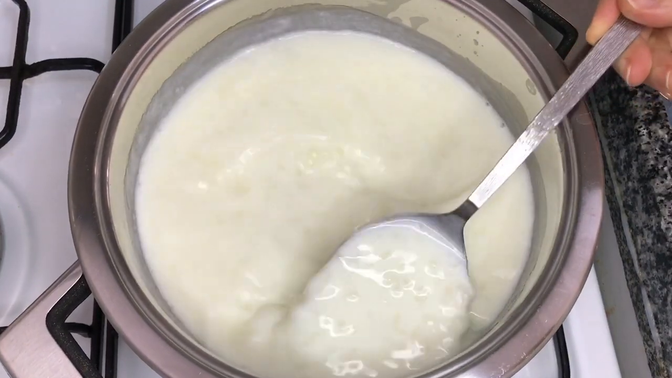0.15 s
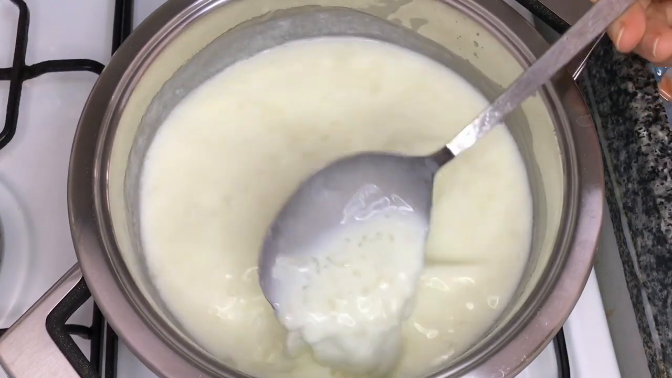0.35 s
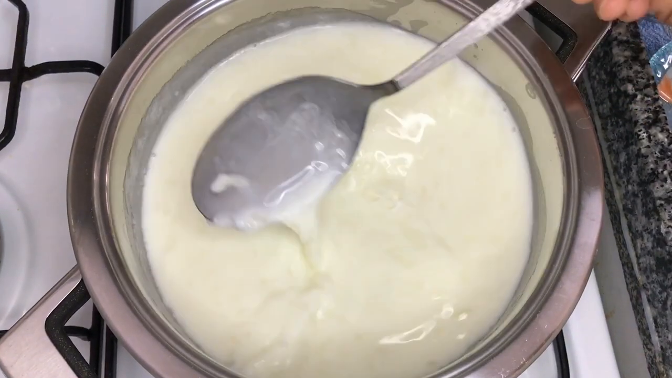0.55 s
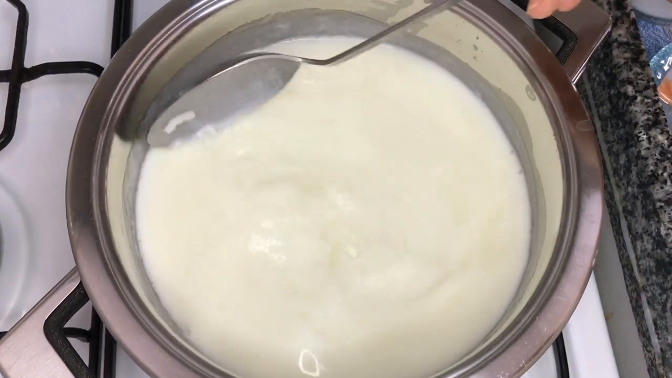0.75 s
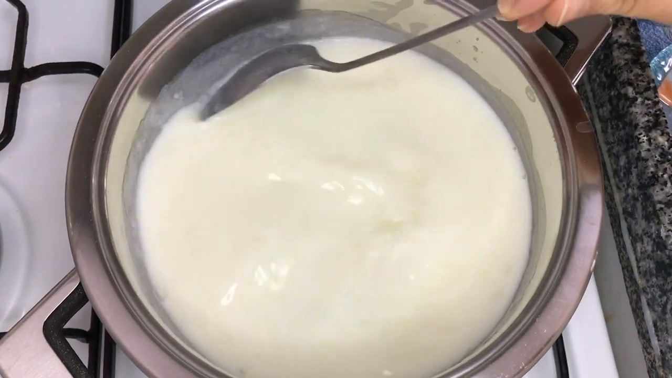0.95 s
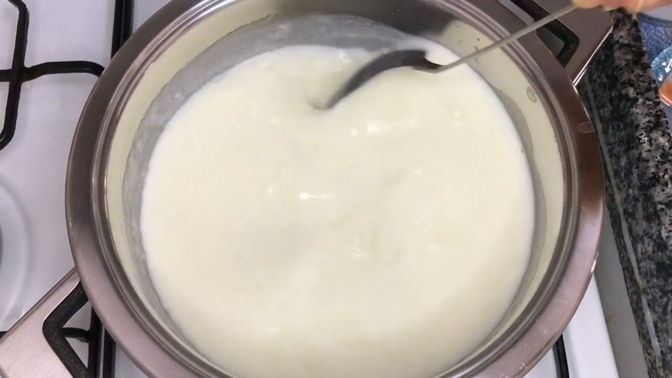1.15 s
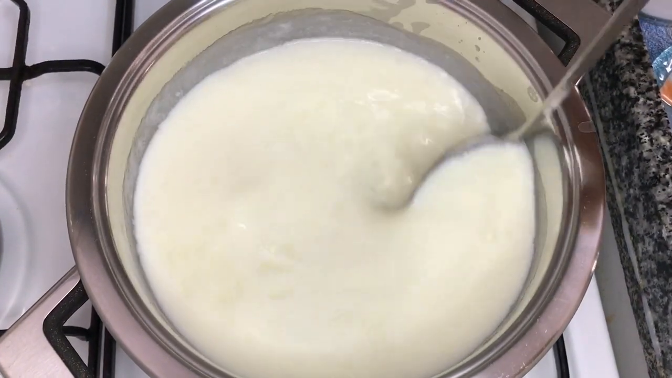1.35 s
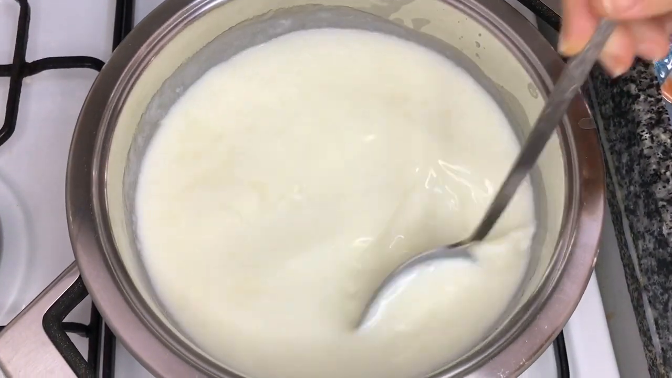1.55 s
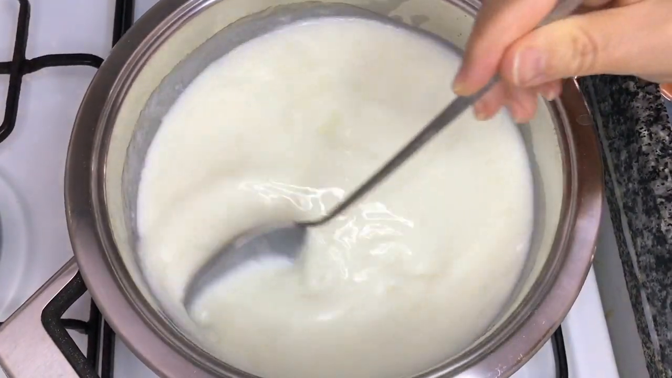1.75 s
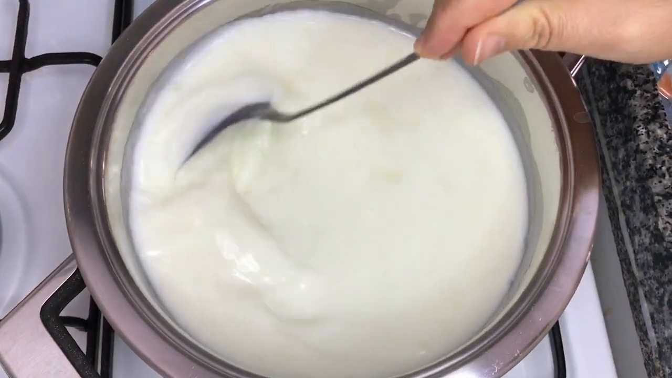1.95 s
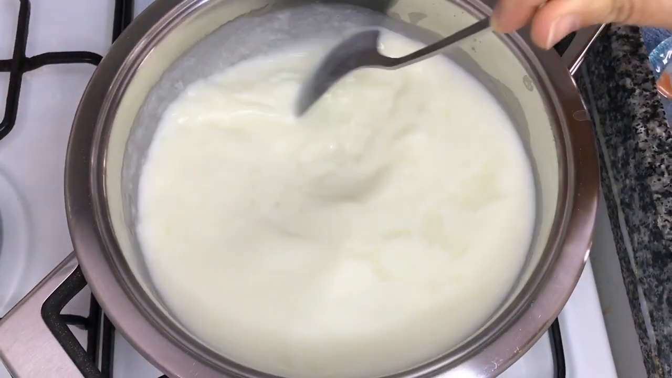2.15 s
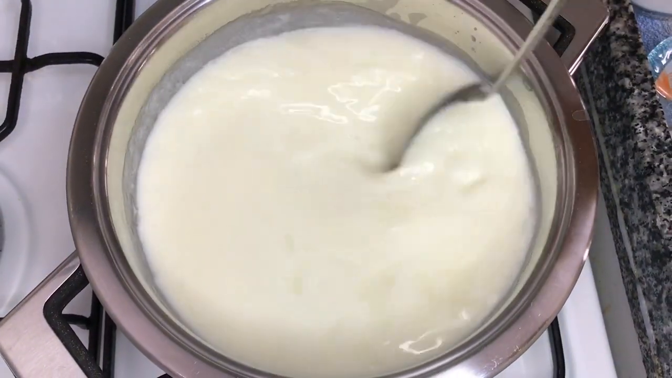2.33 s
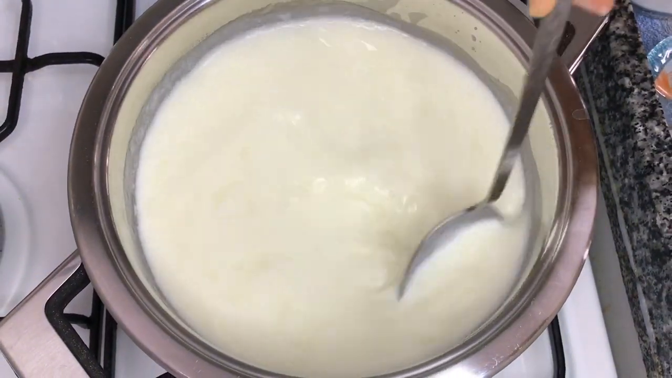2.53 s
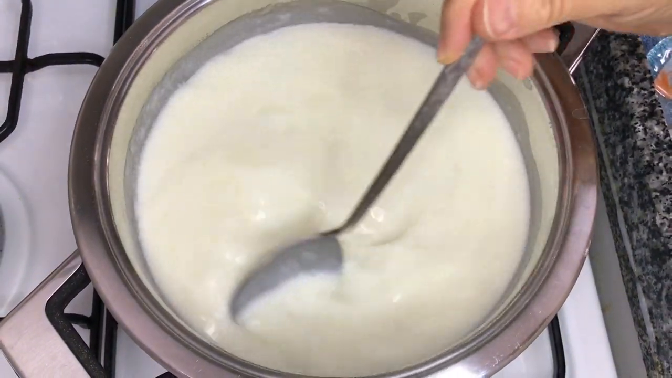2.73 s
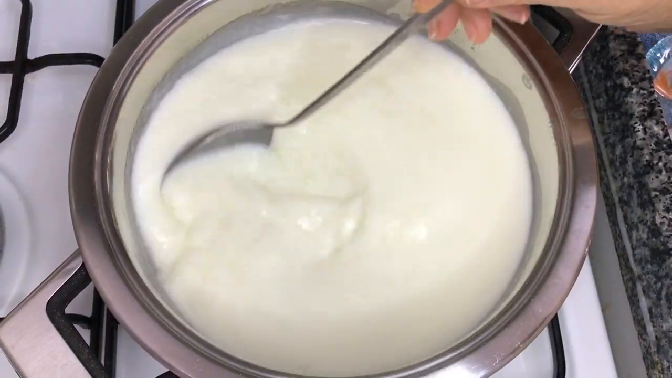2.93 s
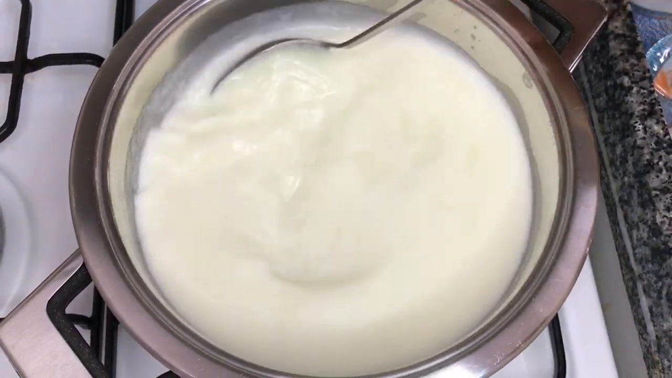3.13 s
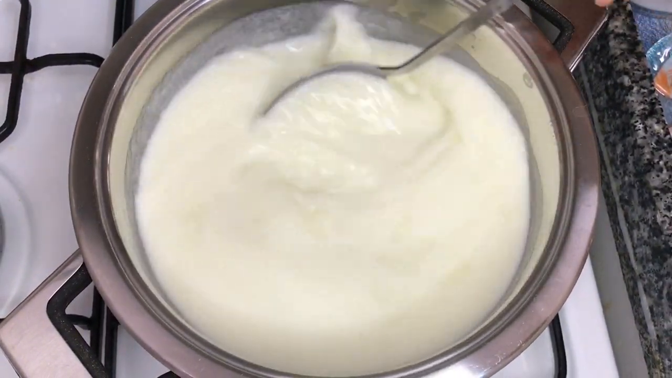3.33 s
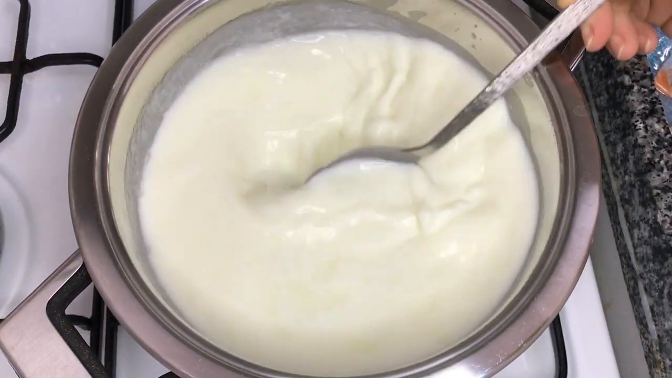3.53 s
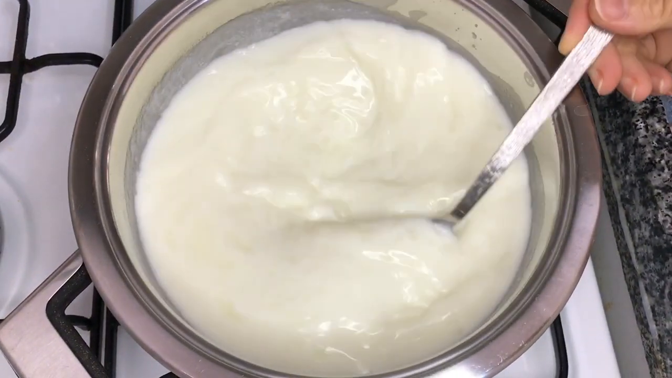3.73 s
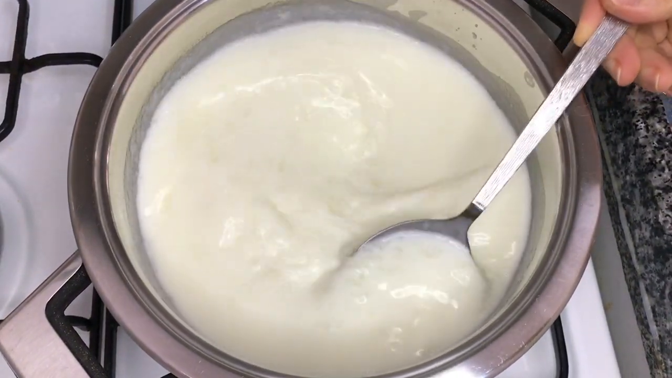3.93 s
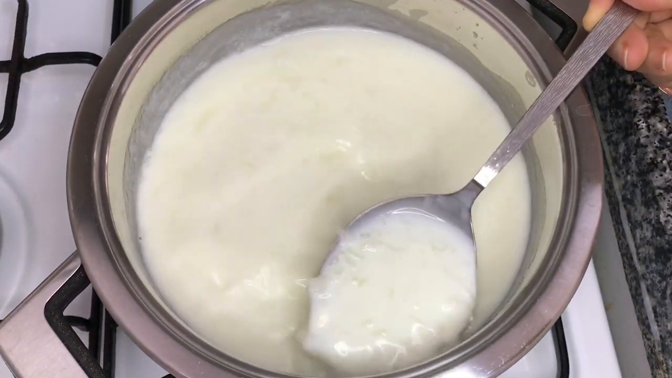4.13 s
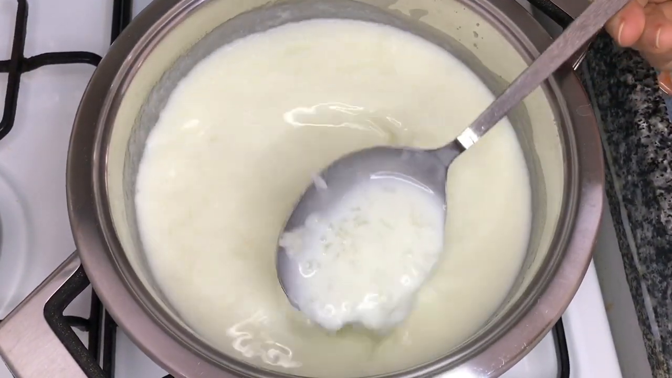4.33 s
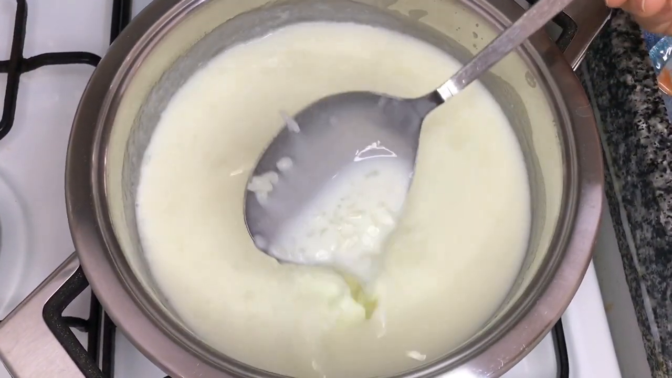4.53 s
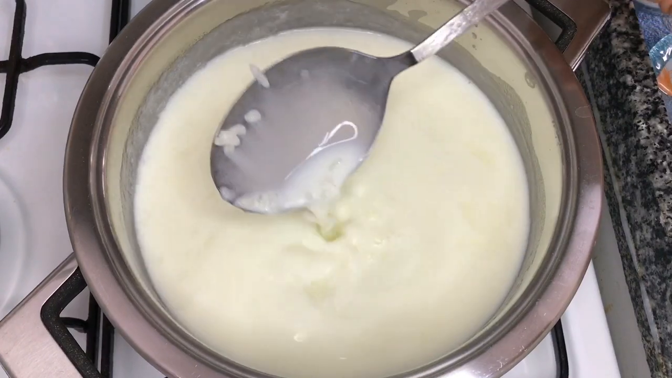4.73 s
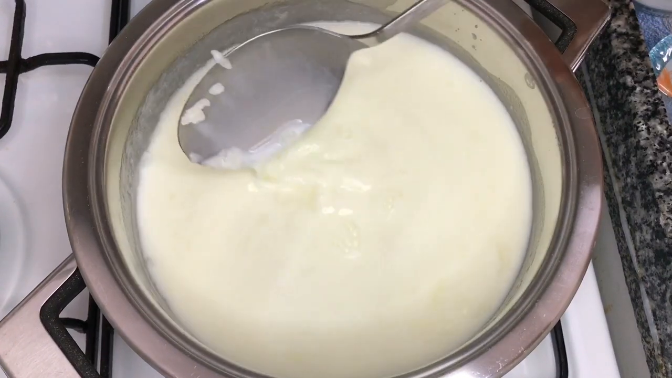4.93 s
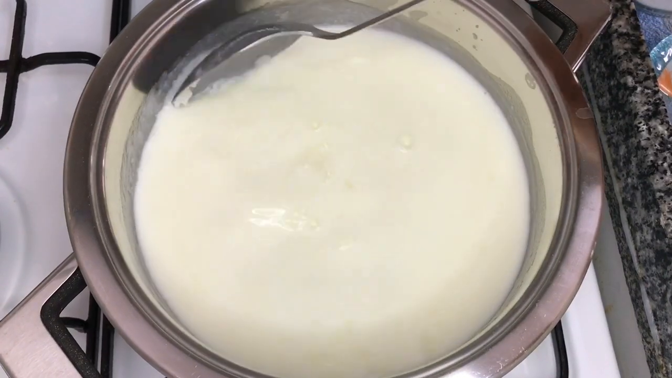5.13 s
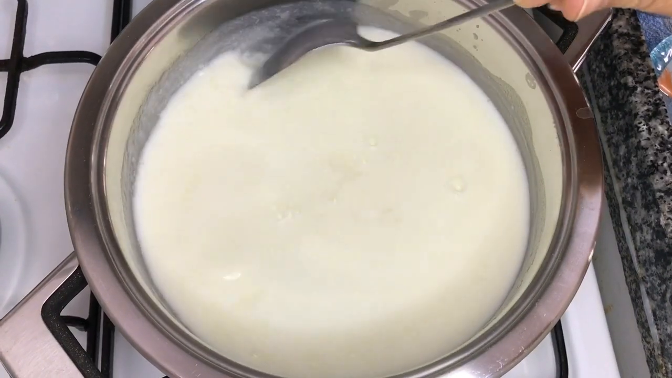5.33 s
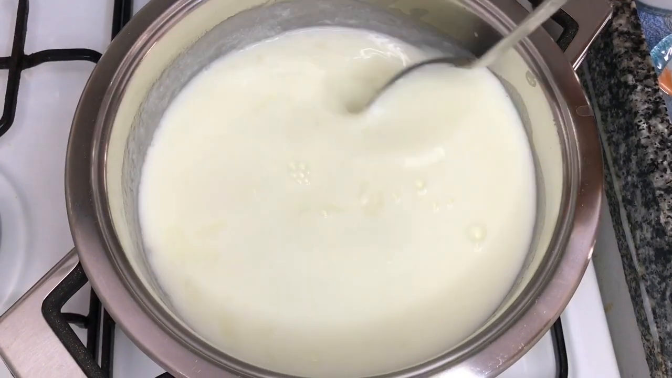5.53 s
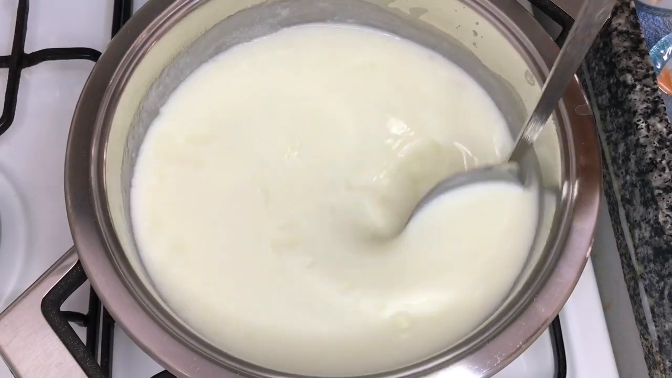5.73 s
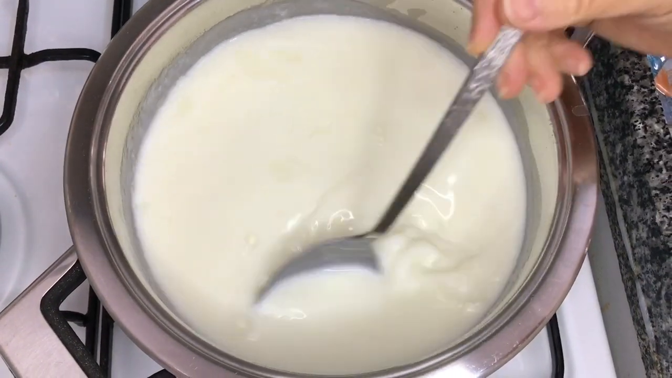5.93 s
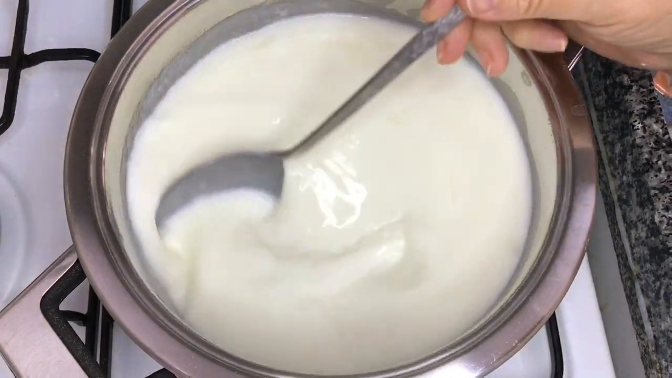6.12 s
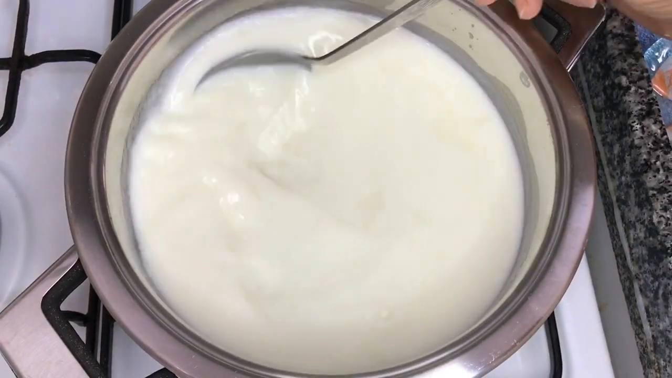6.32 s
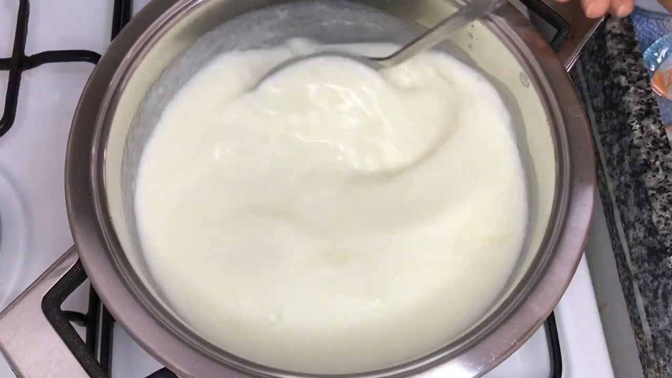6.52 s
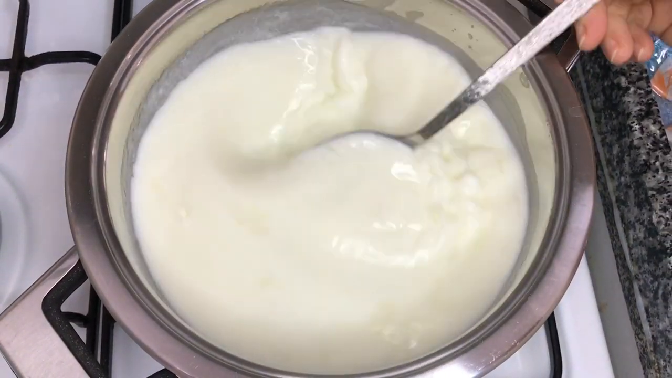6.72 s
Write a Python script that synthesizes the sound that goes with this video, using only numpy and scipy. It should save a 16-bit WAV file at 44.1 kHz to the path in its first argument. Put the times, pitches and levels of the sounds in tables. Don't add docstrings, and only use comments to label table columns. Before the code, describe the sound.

Close, dry-sounding stirring in a small kitchen over quiet burner hiss, low motor rumble, hum and faint passing cars. A brief faint drag opens; from 0.15 to 0.65 s milk falls from the lifted spoon as tiny high ringing plinks. At 1.1 s a sharp clink on the pot wall, then gritty scraping with wavering metallic singing from 1.2 s. Duller knock at 1.7, a strong clink near 2.13, swishing strokes peaking around 2.2, smaller taps at 2.4, 2.7 and 2.9. Scrapes continue at 3.0 and 3.3, with a rising wet gulp at 3.55 and thinner scraping to 4.0. From 4.45 to 4.85 a denser cluster of bubbly drips, then almost only background. At 5.48 the hardest, brightest clink, scraping again at 5.6, a knock at 6.03, softer brushing strokes at 6.15 to 6.65, and two quick low gulps at 6.7.

```python
import sys
import numpy as np
from scipy import signal
from scipy.fft import rfft, irfft
from scipy.io import wavfile
from scipy.ndimage import uniform_filter1d, map_coordinates

SR = 44100
rng = np.random.default_rng(int(sys.argv[2]) if len(sys.argv) > 2 else 0)


def master_out(mix):
    frames = np.transpose(np.atleast_2d(mix))
    ceiling = np.clip(frames, -1, 1)
    pcm = np.round(ceiling * 32767).astype(np.int16)
    wavfile.write(sys.argv[1], SR, pcm)


def makeup_ratio(level_db):
    decades = np.asarray(level_db, float) / 20
    return 10 ** decades


N = 298557

# peak_s, rise_s, fall_s, drag_db, edge_bite_db
STROKES = [(0.0, .05, 0.075, -51.5, -5), (1.098, 0.041, 0.0024, -46.5, 7), (1.3, 0.12, 0.15, -36.5, -2),
           (1.72, 0.049, 0.32, -38, -4), (1.95, 0.058, 0.038, -41.5, -15), (2.1, 0.087, 0.024, -52.5, -12),
           (2.18, 0.038, 0.18, -34.5, -3.5), (2.43, 0.085, 0.14, -40.5, -1.5), (2.74, 0.08, 0.1, -41, -1.5),
           (2.87, 0.086, 0.18, -41.5, 5), (3.02, 0.08, 0.068, -39, -6), (3.3, 0.069, 0.22, -35.5, -1),
           (3.54, 0.05, 0.05, -44, 8), (3.72, 0.04, 0.11, -39, 10), (3.96, 0.069, 0.059, -42.5, 0.5),
           (5.39, .025, .03, -46, 12), (5.46, 0.05, 0.0095, -41, 6), (5.58, 0.077, 0.16, -35.5, 2),
           (5.82, 0.086, 0.087, -41, 0), (6.15, 0.13, 0.2, -38, 2), (6.48, 0.035, 0.074, -37, -1),
           (6.649, 0.086, 0.088, -38, 2)]
# freq_hz, level_db_per_hz
DRAG_SPECTRUM = [(260, -60), (450, -17.5), (725, -10), (1040, -7.5), (1600, -4.5), (2950, -2), (3300, -7),
                 (4520, -0.5), (9000, -25.5), (11700, -60), (19800, -120)]
# freq_hz, level_db_per_hz
GRIT_SPECTRUM = [(4500, -30), (6500, -3), (8500, 0), (11000, -5), (14000, -10), (16500, -16)]
# pitch_hz, width_hz, level_db
DRAG_TONES = [(985, 30, -9), (1264.5, 20, 3), (1570, 23, 4.5), (1734, 10, -1), (2040, 20, -9),
              (2369, 44, 3), (2752, 38, 2), (3043, 32, -2.5), (3570, 65, 0), (3834, 37, 0), (4150, 50, -6),
              (4490, 90, 0), (5450, 52, -7.5), (5920, 270, -8)]
# freq_hz, gain_db
MILK_DAMPING = [(350, 3.5), (650, -5.5), (5500, 4.5), (8000, 1), (16000, -30)]
# peak_s, half_length_s, level_db
GRAIN_CRUSHES = [(1.8, 0.074, -52.5), (2.3, 0.052, -52.5), (3.41, 0.056, -50.5), (5.64, 0.12, -66),
                 (6.18, .08, -58), (6.65, 0.063, -53)]
# peak_s, half_length_s, level_db, pitch_hz
BOWL = [(1.21, 0.025, -40.5, 1570), (1.288, 0.055, -37.5, 1322), (1.438, 0.065, -40.5, 1570),
        (1.77, .05, -44, 1320), (1.893, 0.022, -45.5, 1250), (1.963, .03, -39.5, 1924),
        (2.061, 0.062, -39, 1408), (2.18, 0.03, -43, 1260), (2.35, 0.048, -34, 1432),
        (2.447, 0.084, -41.5, 1640), (3.01, 0.07, -40, 1210), (3.27, 0.045, -42, 1225),
        (3.36, .04, -44, 1600), (3.446, 0.049, -41.5, 1250), (5.592, 0.036, -41, 1330),
        (6.06, .03, -52, 1340), (6.23, .08, -77, 1610), (6.617, 0.03, -53, 1250)]
# peak_s, half_length_s, level_db, pitch_hz
RIM = [(1.193, .05, -44, 2035), (1.32, .04, -42, 2880), (1.49, 0.053, -49, 2940), (1.774, .035, -42, 2740),
       (1.84, .035, -41, 2800), (1.95, .03, -44, 2240), (2.167, 0.027, -38, 2800),
       (2.212, 0.039, -38, 2490), (2.3, .05, -42.5, 2850), (2.38, 0.036, -44, 2940),
       (2.763, 0.072, -46.5, 2744), (2.947, 0.054, -46, 2800), (3.285, .035, -41.5, 2460),
       (3.345, .025, -40, 2340), (3.4, .025, -42, 2500), (3.73, 0.064, -47, 2325),
       (4.02, 0.056, -52.5, 2050), (5.52, .03, -38, 2280), (5.599, 0.048, -41, 2950),
       (5.78, .03, -49, 2280), (6.09, .02, -45, 2850), (6.5, .04, -47, 2800), (6.59, 0.034, -46, 2370)]
# peak_s, half_length_s, level_db, pitch_hz
NECK = [(1.3, 0.067, -49, 4500), (1.453, 0.065, -44.5, 4570), (1.635, .02, -48, 4210),
        (1.882, .025, -42, 3780), (1.95, .03, -40, 3550), (2.19, .05, -42, 4480), (2.278, .05, -42.5, 3620),
        (2.504, .05, -47, 4350), (2.93, 0.052, -43.5, 4490), (3.0, .035, -45, 3800),
        (3.278, 0.041, -43, 3770), (3.37, 0.041, -43.5, 4490), (3.44, .05, -44, 3850),
        (3.6, .03, -49, 3780), (3.7, .025, -43, 3900), (3.76, .035, -46, 3570), (3.82, 0.018, -46, 3960),
        (3.941, 0.039, -46.5, 4500), (3.988, .03, -48, 3460), (5.56, 0.043, -44, 4500),
        (5.702, 0.046, -44, 4530), (5.8, 0.055, -47, 4490), (5.925, .025, -44, 4260),
        (6.14, .05, -45, 4380), (6.49, 0.036, -43, 3750), (6.61, .03, -43, 4500), (6.7, 0.032, -48, 5600)]
# peak_s, fall_s, level_db
SWIRLS = [(0.0, 0.084, -49.5), (.64, 0.042, -58), (1.33, 0.042, -50), (1.5, 0.11, -51),
          (1.77, 0.043, -48.5), (2.5, 0.15, -54.5), (3.37, 0.07, -47), (3.55, 0.04, -49),
          (3.885, 0.03, -49), (3.99, .06, -56), (4.67, 0.12, -74), (5.62, 0.063, -56), (5.88, 0.065, -48.5),
          (6.23, 0.17, -50), (6.6, 0.24, -54), (6.76, 0.044, -43)]
# start_s, peak_db, nearest_tone_hz, nearest_tone_db, contact_softness_ms
KNOCKS = [(1.113, -3, 3910, -6.5, 1.7), (1.684, -10.5, 1560, -1.5, 4.5), (2.1028, -23, 1440, 4, 0.69),
          (2.126, -6, 3570, -7.5, 1.1), (2.1478, -15, 2560, 1, 1.6), (2.425, -21, 2940, 4.5, 1.8),
          (2.692, -11.5, 1560, -6.5, 0.43), (2.864, -25.5, 4500, 2, 1.2), (5.4755, -1, 5150, -3, 0.8),
          (5.478, -11.5, 3620, 3.5, 0.83), (5.643, -17.5, 3820, -2, 0.67), (6.027, -13, 4480, 0, 3.7),
          (6.168, -21, 3720, -3, 1.5), (6.0262, -17.5, 5980, 3, 0.57), (2.1236, -20.5, 9500, -8, 0.43),
          (1.6826, -19, 3810, -0.5, 0.74), (1.971, -21.5, 2420, 3, 2.5), (3.318, -23, 4100, 2, 2),
          (6.459, -27.5, 3770, 0, 1.5), (6.1, -27.5, 4220, 0, 1)]
# pitch_hz, level_db, t60_s
POT_MODES = [(720, -3.5, 0.21), (1244, -3, 0.049), (1570, -1.5, 0.077), (2046, -3.5, 0.18),
             (2110, -12, .06), (2280, -1.5, 0.21), (2440, -11, 0.095), (2860, -4, 0.19), (3440, -24, 0.045),
             (3570, -15, 0.043), (4500, 9, 0.037), (4480, -9, 0.052), (4270, -29, 0.036),
             (4870, -22, 0.045)]
# pitch_hz, level_db, t60_s
GRATE_MODES = [(75, -29, 0.2), (121.6, -39, 0.52), (151, -44, 0.17), (304.5, -30.5, 0.091),
               (501, -31.5, 0.069)]
# freq_hz, level_db_per_hz
CRACK_SPECTRUM = [(240, -38), (400, -1), (655, -28), (1010, -0.5), (1530, -8), (2930, 4.5), (3260, 3.5),
                  (3640, 5), (5430, 2), (16000, -36)]
# start_s, level_db, pitch_hz, length_s
SLIPS = [(1.245, -25.5, 2580, 0.017), (1.276, -25.5, 1570, 0.038), (1.307, -27, 3020, 0.02),
         (1.868, -24, 1230, 0.023), (1.891, -22.5, 3680, 0.039), (1.938, -24, 1890, 0.036),
         (1.97, -18.5, 1304, 0.017), (2.0797, -23, 1370, 0.013), (2.188, -17, 2540, 0.024),
         (3.002, -18.5, 1165, 0.013), (3.32, -21, 2404, 0.037), (3.514, -16.5, 1570, 0.0081),
         (3.66, -22, 2340, 0.025), (5.913, -25.5, 4150, 0.039), (6.21, -17, 2880, 0.018),
         (6.327, -30, 953, 0.023), (6.644, -24, 4510, 0.014), (1.382, -27, 3000, 0.014),
         (1.432, -31, 5000, .015), (1.659, -33, 4070, 0.013), (2.518, -30, 2600, .012),
         (3.456, -27, 3500, .012), (3.525, -30, 4500, 0.011), (3.561, -25, 4430, .015),
         (3.797, -28, 5370, .02), (5.975, -30, 2620, .012), (6.307, -29, 4310, .012),
         (6.339, -25, 3150, .012), (6.73, -28, 4420, .015), (3.7, -27, 5120, .02), (3.745, -28, 5700, .015),
         (2.036, -27, 1400, .008), (2.057, -27, 1400, .008)]
# start_s, bubble_db, pitch_hz, ring_cycles, splash_over_bubble_db
DRIPS = [(0.158, -26.5, 4600, 61, -25), (0.494, -42, 5500, 35, 0), (0.51, -27.5, 2260, 41, 0),
         (0.573, -20.5, 3700, 43, -7.5), (0.605, -18, 4540, 63, -22), (0.633, -28.5, 2390, 60, -6),
         (4.467, -21, 5100, 54, -11.5), (4.485, -32.5, 1614, 53, 4.5), (4.52, -18.5, 4950, 58, -20),
         (4.534, -16.5, 4270, 52, -15), (4.545, -20, 3630, 34, -6.5), (4.554, -26, 1310, 26, -5),
         (4.608, -19, 985, 44, -3.5), (4.653, -19.5, 5160, 80, -4), (4.656, -22, 4900, 74, -2.5),
         (4.713, -23, 4510, 54, -12), (4.792, -26, 3930, 48, -5), (4.84, -25, 2550, 42, -7),
         (4.851, -26.5, 4700, 47, -7.5), (.497, -36, 14000, 60, 2), (.533, -44, 9000, 40, 0),
         (.664, -48, 14000, 50, 0), (.455, -52, 14000, 50, 0), (.86, -46, 7000, 30, 4),
         (.89, -52, 14000, 50, 0), (4.41, -48, 14000, 50, 0), (4.225, -48, 8000, 40, 0),
         (4.556, -40, 13600, 60, 0), (4.672, -44, 9500, 40, 4), (4.482, -48, 13000, 50, 0)]
# start_s, length_s, from_hz, to_hz, level_db
GULPS = [
    (3.54, .07, 680, 2400, 0),
    (3.63, .02, 1050, 1650, -9),
    (6.7, .035, 780, 1100, -4),
    (6.738, .034, 1050, 1700, -3),
]
# centre_hz, width_hz, level_db
FLAME_BANDS = [(2242, 66, -58), (2910, 390, -62), (3260, 53, -64), (4510, 33, -63), (4810, 240, -64),
               (5300, 55, -66), (7700, 240, -68.5), (9370, 380, -66.5), (9950, 730, -63),
               (11970, 220, -75.5)]
# freq_hz, gain_db
FLAME_ROLLOFF = [(11000, 0), (12400, 3.5), (13200, -14), (14200, -12), (16000, -14)]
# freq_hz, level_db_per_hz
KITCHEN_AIR = [(21, 10.5), (35, 10.5), (74, -9), (109, 0), (177, -34), (328, -20.5), (483, -20),
               (1390, -15.5), (1500, -16.5), (2200, -11.5), (4090, -17), (4530, -9), (6490, -21),
               (9000, -26), (12600, -31), (13300, -42), (14300, -37), (16400, -40)]
# time_s, level_db
DRONE = [(0, -42), (.7, -46), (1.2, -45), (1.75, -43.5), (2.15, -39.5), (2.8, -44.5), (3.25, -48.5),
         (4.15, -44), (5.15, -51), (5.55, -45), (6.77, -52)]
# peak_s, fall_s, level_db, pitch_hz
ROCKS = [(1.22, .1, -48, 77.2), (1.76, .12, -47.5, 74.2), (2.25, 0.062, -45.5, 79.5),
         (2.8, 0.087, -42.5, 78.9), (5.57, .08, -55, 76.6), (6.52, 0.2, -47.5, 58.7)]
# peak_s, half_length_s, level_db
TRAFFIC = [(.25, 0.27, -58), (1.3, 0.63, -56), (2.5, 0.54, -55.5), (3.85, 0.45, -58.5), (5.8, 0.62, -54)]
DROPOUTS = [.335, 0.611, .821, 1.541, 2.585, 2.636, 2.819, 3.12, 3.212, 3.845, 3.884, 4.21, 4.49, 4.835,
            5.719, 5.859, 6.229, 6.37, 6.438, 6.673]

LOWEST_HZ = 722
SWELL_EDGE_DB, SWELL_STEEPNESS = -5.5, 1.98
GLANCE_DB, LOW_RING_DB = -19.5, 8
KITCHEN_DB, HUM_DB = -45.5, -60


def unit_rms(x):
    return x / np.sqrt(np.mean(x ** 2) + 1e-20)


def read(points, hz):
    f, value = np.transpose(points)
    return np.interp(np.log(hz + 1), np.log(f + 1), value)


def add(mix, start_s, sound):
    part = mix[max(round(start_s * SR), 0):][:len(sound)]
    part += sound[:len(part)]


def colour(x, points):
    hz = np.fft.rfftfreq(len(x), 1 / SR)
    return irfft(rfft(x) * makeup_ratio(read(points, hz)), len(x))


def resonate(x, hz, width_hz):
    turn = np.exp(2j * np.pi * np.cumsum(hz * np.ones(len(x))) / SR)
    r = np.exp(-np.pi * width_hz / SR)
    smooth = signal.lfilter([1 - r], [1, -r], x / turn + 1e-18)
    return 2 * (turn * smooth).real


def wander(per_s):
    knots = rng.standard_normal(400)
    return unit_rms(map_coordinates(knots, [np.arange(N) * per_s / SR], order=3))


def patchy(points, patch_db, span_frames, span_bins):
    a, b, patches = rng.standard_normal((N // 128 + 5, 257, 3)).T
    patches = uniform_filter1d(patches, span_bins, 0)
    patches = unit_rms(uniform_filter1d(patches, span_frames, 1))
    z = (a + 1j * b) * makeup_ratio(patch_db * patches)
    noise = signal.istft(z, nperseg=512, noverlap=384)[1][:N]
    return unit_rms(colour(noise, points))


def swells(peak_s, rise_s, fall_s, db):
    late_s = np.arange(0, N + 64, 64)[:, None] / SR - peak_s
    distance = np.where(late_s < 0, -late_s / rise_s, late_s / fall_s)
    return makeup_ratio(db + SWELL_EDGE_DB * distance ** SWELL_STEEPNESS)


def joined(gains):
    total = np.sqrt((gains ** 2).sum(1))
    return np.interp(np.arange(N) / 64, np.arange(len(total)), total)


def played(rows, rise_share):
    peak_s, fall_s, db = np.transpose(rows)[:3]
    return joined(swells(peak_s, rise_share * fall_s, fall_s, db))


def slide(rows):
    columns = np.transpose(rows)
    return np.interp(np.arange(N) / SR, columns[0], columns[-1])


def held(rows):
    peak_s, half_s, db, hz = np.transpose(rows)
    power = swells(peak_s, half_s, half_s, db) ** 8 + 1e-300
    return np.interp(np.arange(N) / 64, np.arange(len(power)), power @ hz / power.sum(1))


def sung(ticks, rows, width_hz):
    hz = held(rows)
    tone = unit_rms(resonate(resonate(ticks, hz, width_hz), hz, 240))
    return played(rows, 0.86) * tone * makeup_ratio(1.8 * wander(25))


def drag_tone(ticks, hz, width_hz, db):
    level_db = db + 2.6 * wander(7.7) + 2.2 * wander(30)
    pitch_hz = hz * (1 + 0.012 * wander(4.5))
    return makeup_ratio(level_db) * unit_rms(resonate(ticks, pitch_hz, width_hz))


def stirring():
    *shape, bite_db = np.transpose(STROKES)
    pushes, bite = swells(*shape), makeup_ratio(bite_db / 2)
    burst_db = 2.36 * np.minimum(rng.exponential(1, N), 5)
    ticks = rng.standard_normal(N) * makeup_ratio(burst_db) * makeup_ratio(2.4 * wander(45))

    tones = sum(drag_tone(ticks, *row) for row in DRAG_TONES)
    rub = patchy(DRAG_SPECTRUM, 3.8, span_frames=14, span_bins=3)
    steel = unit_rms(colour(tones, MILK_DAMPING)) + makeup_ratio(-2.0) * rub
    treble = colour(steel, [(2800, -63), (3500, -4.5), (20000, 6.0)])
    steel = (steel - treble) * joined(pushes / bite) + treble * joined(pushes * bite)

    spoon = sung(ticks, BOWL, 38) + sung(ticks, RIM, 50) + makeup_ratio(-1.5) * sung(ticks, NECK, 100)
    crush_gain = played(GRAIN_CRUSHES, 1.0) + makeup_ratio(-26.5) * joined(pushes)
    grit = patchy(GRIT_SPECTRUM, 3.5, span_frames=12, span_bins=11) * crush_gain

    lowest = unit_rms(resonate(resonate(ticks, LOWEST_HZ, 18), LOWEST_HZ, 90))
    lowest = makeup_ratio(1.8 * wander(28)) * lowest
    swirl_gain = 0.8 * played(SWIRLS, 0.76) + makeup_ratio(-17.0) * joined(pushes)
    return steel + spoon + grit + swirl_gain * lowest


def knock(start_s, peak_db, near_hz, near_db, soft_ms):
    chance = rng.standard_normal(20000)
    t = np.arange(20000) / SR
    hz, db, t60_s = np.transpose(POT_MODES)
    over_db = peak_db - GLANCE_DB
    low_db = LOW_RING_DB + 3.2 * min(over_db, 0) - 0.33 * max(over_db, 0)
    db = db + 1.8 * chance[:len(hz)] + np.where(hz < 2100, low_db, 0)
    hz = hz * (1 + 0.011 * chance[99:99 + len(hz)] * (hz > 2100))
    t60_s = np.minimum(t60_s, 0.11)
    ring = makeup_ratio(db - 60 * t[:, None] / t60_s) * np.sin(2 * np.pi * hz * t[:, None])
    near = makeup_ratio(near_db - 60 * t / 0.025) * np.sin(2 * np.pi * near_hz * t)

    contact_s = soft_ms / 1000 * (0.6 - 0.052 * peak_db)
    crack_decay = np.exp(-t / contact_s) + 0.18 * np.exp(-t / 0.0069)
    crack = unit_rms(colour(chance, CRACK_SPECTRUM)) * crack_decay
    tick = makeup_ratio(-24.0) * np.diff(chance, 2, prepend=[0, 0]) * np.exp(-t / 0.0004)
    rise = 1 - np.exp(-(t * 1.7 / contact_s) ** 2)
    struck = rise * (makeup_ratio(-21) * ring.sum(1) + near + makeup_ratio(-2.0) * crack + tick)

    grate = sum(makeup_ratio(d - 60 * t / r) * np.sin(2 * np.pi * f * t) for f, d, r in GRATE_MODES)
    grate = grate * (1 - np.exp(-t / 0.039))
    return start_s + 0.0006, makeup_ratio(peak_db) * (struck + makeup_ratio(-0.55 * peak_db) * grate)


def slip(start_s, db, hz, length_s):
    chance = rng.standard_normal(4096)
    t = np.arange(4096) / SR
    u = t / length_s
    caught = 0.6 * np.sin(2 * np.pi * hz * t)
    judder = 0.75 * unit_rms(resonate(chance, hz, 160))
    scrape = 0.3 * unit_rms(colour(chance, DRAG_SPECTRUM))
    envelope = (1 - np.exp(-u * 25)) * np.exp(-2.2 * u ** 2)
    return start_s - 0.002, makeup_ratio(db - 9.0) * (caught + judder + scrape) * envelope


def drip(start_s, db, hz, cycles, tick_db):
    chance = rng.standard_normal(4096)
    t = np.arange(4096) / SR
    life = t * hz / cycles
    pitch_hz = hz * 2 ** (0.076 * np.minimum(life, 1))
    bubble = np.sin(2 * np.pi * np.cumsum(pitch_hz) / SR)
    bubble = bubble * makeup_ratio(-60 * life) * (1 - np.exp(-t / 0.0014))
    splash = colour(chance, [(hz * 0.31, -40), (hz * 1.05, 0), (hz + 2500, -8), (20000, -30)])
    decay = np.exp(-t / 0.0035) + 0.2 * np.exp(-t / 0.015)
    tick = makeup_ratio(tick_db - 7.5) * unit_rms(splash) * decay
    return start_s, makeup_ratio(db - 2.0) * (bubble + tick)


def gulp(start_s, length_s, from_hz, to_hz, db):
    u = np.linspace(0, 1, round(length_s * SR))
    climb = 0.25 * u + 0.75 * u ** (length_s * 70)
    pitch_hz = from_hz * (to_hz / from_hz) ** climb
    swell = np.sin(np.pi * u ** 3.6) ** 0.6
    wobble = makeup_ratio(3.2 * unit_rms(uniform_filter1d(rng.standard_normal(len(u)), 120)))
    tone = np.sin(2 * np.pi * np.cumsum(pitch_hz) / SR)
    return start_s, makeup_ratio(db - 32.0) * tone * swell * wobble


def kitchen_echo(x):
    taps = np.zeros(SR // 2)
    at = np.arange(150, len(taps) - 20, 20)
    taps[at + rng.integers(0, 20, len(at))] = rng.choice([-1., 1.], len(at))
    hz, t, z = signal.stft(taps, SR, nperseg=256)
    t60_s = read([(500, 0.42), (3000, 0.2), (12000, 0.073)], hz)[:, None]
    tail = signal.istft(z * makeup_ratio(-60 * t / t60_s), SR, nperseg=256)[1]
    return signal.fftconvolve(x, tail / np.linalg.norm(tail))[:N]


def gas_flame():
    air = rng.standard_normal(N)
    hiss = sum(makeup_ratio(db) * unit_rms(resonate(resonate(air, hz, width), hz, width * 2))
               for hz, width, db in FLAME_BANDS)
    return colour(hiss, FLAME_ROLLOFF) * makeup_ratio(1.0 * wander(2.07))


def pot_rocking():
    tone = np.sqrt(2) * np.sin(2 * np.pi * np.cumsum(slide(ROCKS)) / SR)
    return played(ROCKS, 0.79) * tone


def far_motor():
    tone = np.sin(2 * np.pi * np.cumsum(27.0 + 1.2 * wander(3)) / SR)
    rumble = unit_rms(resonate(rng.standard_normal(N), 28, 10))
    return makeup_ratio(slide(DRONE)) * unit_rms(tone + 0.35 * rumble)


def hum_and_traffic():
    air = rng.standard_normal((2, N))
    hum = colour(air[0], [(34, -8), (48, 5), (80, 8.0), (120, -0.5), (145, -43)])
    murmur = colour(air[1], [(170, -25.0), (240, -7.5), (340, -3), (450, -27.5), (800, -70)])
    return makeup_ratio(HUM_DB) * unit_rms(hum) + played(TRAFFIC, 0.8) * makeup_ratio(-3.0) * unit_rms(murmur)


def background():
    air = makeup_ratio(KITCHEN_DB - 5.5) * patchy(KITCHEN_AIR, 0.33, span_frames=20, span_bins=4)
    return gas_flame() + air + pot_rocking() + far_motor() + hum_and_traffic()


def scene():
    steel, milk, pockets = np.zeros((3, N))
    for row in KNOCKS:
        add(steel, *knock(*row))
    for row in SLIPS:
        add(steel, *slip(*row))
    for row in DRIPS:
        add(milk, *drip(*row))
    for row in GULPS:
        add(pockets, *gulp(*row))
    milk = milk + makeup_ratio(24.0) * resonate(milk, LOWEST_HZ, 5)
    echo = makeup_ratio(-10.5) * kitchen_echo(steel + milk)
    return (steel + milk + pockets + echo + stirring() + background())[None]


def top_cut(x):
    return signal.sosfilt(signal.butter(12, 16680, fs=SR, output="sos"), x)


def record(dry):
    hz, t, z = signal.stft(dry[0], SR, nperseg=1024, noverlap=768)
    starved = sum(np.exp(-((t - s) / 0.0105) ** 2) for s in DROPOUTS)
    power = abs(z) ** 2
    weak = power < 1.1 * uniform_filter1d(power, size=40, axis=0)
    tilt_db = read([(3000, 0.5), (7000, -6.0)], hz)[:, None]
    loss_db = -14.0 * weak * (hz[:, None] > 300) + tilt_db
    kept = signal.istft(z * makeup_ratio(loss_db * starved), SR, nperseg=1024, noverlap=768)[1][:N]
    limited = colour(kept, [(15700, 0), (15880, -36), (20000, -50)])
    return top_cut(limited[None])


dry = scene()
out = record(dry)
master_out(out)
```